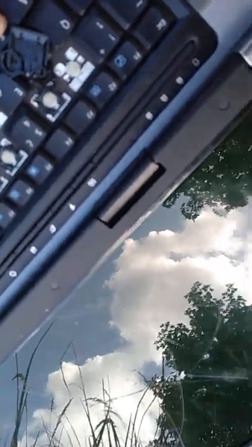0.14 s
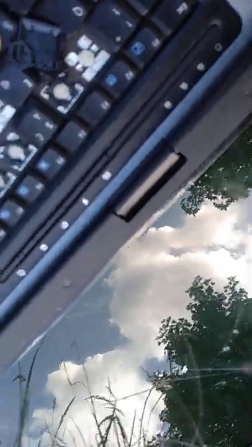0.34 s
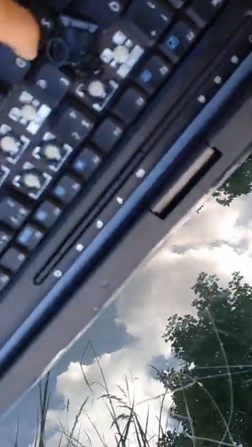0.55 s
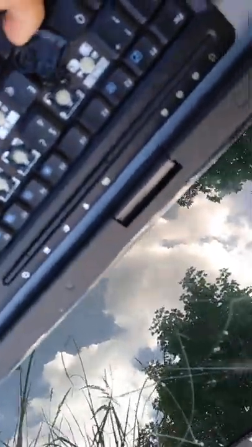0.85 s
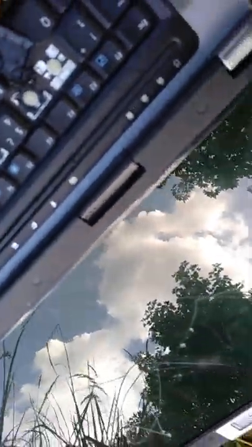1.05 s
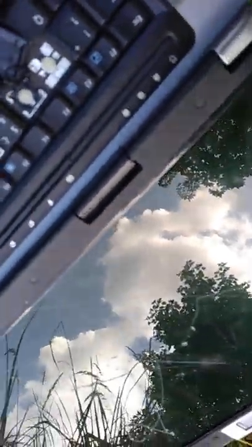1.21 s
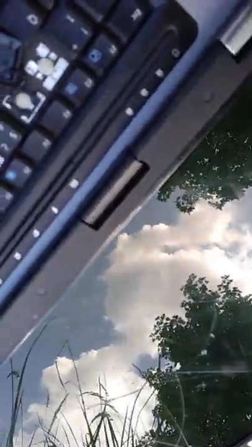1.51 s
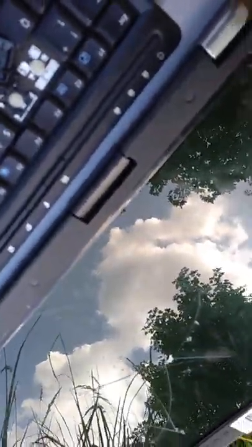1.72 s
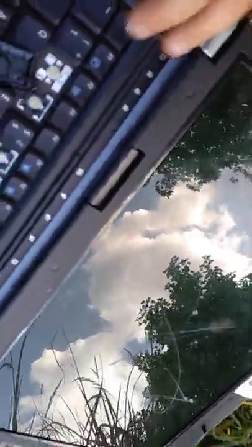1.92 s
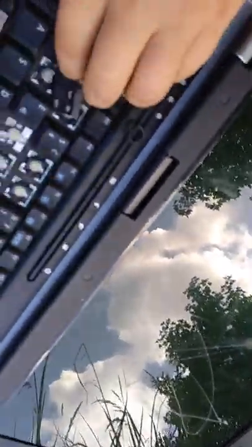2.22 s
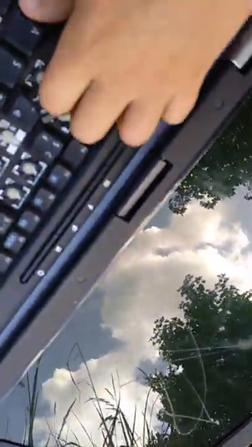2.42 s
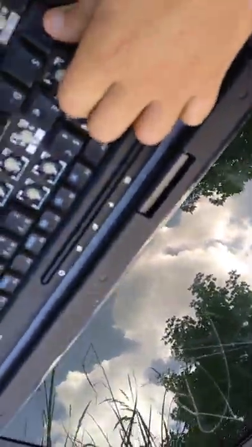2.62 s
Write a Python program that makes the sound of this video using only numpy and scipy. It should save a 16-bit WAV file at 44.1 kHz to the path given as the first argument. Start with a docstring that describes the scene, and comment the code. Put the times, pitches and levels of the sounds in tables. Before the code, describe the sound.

Plastic keycaps snap and click as they are pried off a laptop keyboard outdoors.

```python
"""Prying off laptop keycaps

Outdoors, close to the microphone, plastic keycaps are pried off a laptop keyboard.
Clips let go with hard snaps; loose caps tick and rattle, ring the thin metal retainers and knock
the hollow case. Fingers rub and scrabble over the keys, busiest at the end. Far off, a motor hums."""
import sys
import numpy as np
from scipy import signal
from scipy.fft import rfft, irfft, next_fast_len
from scipy.io import wavfile
from scipy.ndimage import map_coordinates

SR = 44100
rng = np.random.default_rng(int(sys.argv[2]) if len(sys.argv) > 2 else 0)


def unload_wav(signal):
    """Save mono or channel-first audio to the path in sys.argv[1] as 16-bit WAV at rate SR, clipped to [-1, 1]."""
    wavfile.write(
        sys.argv[1],
        SR,
        np.round(np.clip(np.atleast_2d(signal).T, -1, 1) * 32767).astype(np.int16),
    )


N = 121275
RING_SIZE = SR // 8
SCENE_T, RING_T = np.arange(N) / SR, np.arange(RING_SIZE) / SR  # seconds into the scene, into one ring
ATTACK = 1 - np.exp(-RING_T / 0.000043)  # the near-instant rise of a hard contact
CONTACT_GAIN_DB = -3.5  # on striking caps and touching edges
TICK_T60_S, CLACK_T60_S, CASE_T60_S = 0.014, 0.022, 0.073


def amp(db):
    """Decibels to gain."""
    return 10 ** (np.asarray(db) / 20)


def unit(x):
    """Scale to rms 1."""
    return x / np.sqrt(np.mean(x ** 2) + 1e-20)


def fade(t60):
    """An exponential decay, 60 dB down after t60 seconds."""
    return np.exp(-np.log(1000) * RING_T / t60)


def curves(rows):
    """One value per sample for each column after the time."""
    times, *columns = np.transpose(rows)
    return [np.interp(SCENE_T, times, column) for column in columns]


def colour(x, points):
    """Minimum-phase filter with the gain of (Hz, dB) points."""
    size = 4096
    hz, db = np.transpose(points)
    bin_hz = np.fft.rfftfreq(size, 1 / SR)
    gain = amp(np.interp(np.log(bin_hz + 1), np.log(hz), db))
    cepstrum = irfft(np.log(gain))
    cepstrum[1:size // 2] *= 2
    cepstrum[size // 2 + 1:] = 0
    impulse = irfft(np.exp(rfft(cepstrum)))
    return signal.fftconvolve(x, impulse)[:len(x)]


def add(track, start_s, sound):
    """Mix a sound into a track at a time."""
    part = track[round(start_s * SR):][:len(sound)]
    part += sound[:len(part)]


def burst(spectrum, t60):
    """Dense modes of a small part, struck once; rms 1 over the first milliseconds."""
    deck_shiver = amp(-20.5) * fade(0.05)
    envelope = ATTACK * (fade(t60) + deck_shiver)
    strike = colour(rng.standard_normal(RING_SIZE) * envelope, spectrum)
    return strike / np.sqrt(np.mean(strike[:200] ** 2))


def ringing(modes_hz, t60):
    """Equally strong modes of one part, struck together."""
    return sum(np.sin(2 * np.pi * hz * RING_T) for hz in modes_hz) * fade(t60) * ATTACK


def cap_shift():
    """Caps differ a little in size and so in pitch: random factors for a spectrum's (Hz, dB)."""
    return [np.exp(0.04 * rng.normal()), 1]


# Clips letting go: (time [s], level [dB], push level [dB], three resonances [Hz])
CLIP_SNAPS = [(0.1574, -12.5, -29.5, 5580, 9600, 14000), (0.2942, -9, -5, 5030, 9700, 13200),
              (1.7563, -16.5, -20.5, 7900, 10500, 13300), (1.8707, -10, -11, 7150, 9240, 11340)]
def clip_snaps(t60=0.0045):
    """A clip lets go: one push, three heavily damped resonances, a crack and a short shiver."""
    out = np.zeros(N)
    crack_spectrum = [(1400, -18.5), (5000, -5.5), (13000, -8.5), (16000, -5)]
    for start_s, db, push_db, *modes_hz in CLIP_SNAPS:
        modes = sum(gain * np.cos(2 * np.pi * hz * RING_T) for hz, gain in zip(modes_hz, amp([2, 7, 2])))
        ring = modes * ATTACK * fade(t60)
        hiss = unit(colour(rng.standard_normal(RING_SIZE), crack_spectrum))
        crack = amp(-8.5) * hiss * fade(t60)
        shiver = amp(-9) * hiss * fade(0.023)
        push = np.exp(-RING_T / 0.000061) + 1.3 * np.sin(2 * np.pi * 2700 * RING_T) * fade(0.0023)
        add(out, start_s, amp(db) * (ring + crack + shiver) + amp(push_db) * push)
    return out


# Spectra of a cap's clack and of the hollow case: (frequency [Hz], gain [dB])
CLACK_SPECTRUM = [(1500, -12.5), (3000, 1), (4000, -1), (5100, 4.5), (5800, -2.5), (6800, 7.5), (9000, -17)]
CASE_SPECTRUM = [(40, -13), (230, -12), (450, 2), (590, -5), (740, 5), (930, -0.5), (1900, 0), (2350, 2.5),
                 (2900, -2), (5500, -12.5)]
# Caps striking, levels relative: (time [s], tick [dB], clack [dB], knock [dB])
CAP_STRIKES = [(0.5643, -35, -34, -37), (0.678, -24.5, -33, -37.5), (1.026, -11.5, -21.5, -32.5),
               (1.0562, -12.5, -22.5, -35), (1.213, -18.5, -25, -36.5), (1.2488, -18.5, -26.5, -39),
               (1.2628, -23.5, -31, -41), (1.387, -26.5, -24, -31), (1.491, -22, -28, -40),
               (1.511, -16.5, -29.5, -44), (1.5757, -23.5, -36.5, -40), (1.6217, -24.5, -26.5, -49),
               (1.812, -32.5, -33, -49), (2.0103, -26, -30, -34.5), (2.035, -11.5, -21.5, -31),
               (2.0435, -10, -24, -35.5), (2.2267, -9, -18.5, -15), (2.2346, -11.5, -20.5, -18),
               (2.2424, -11.5, -26, -42), (2.3297, -17, -31.5, -43), (2.3466, -12, -27, -54),
               (2.386, -15.5, -31, -28), (2.4353, -23.5, -33, -34), (2.4977, -14.5, -16.5, -24),
               (2.5029, -13.5, -45, -29.5), (2.592, -15, -14, -21), (2.5973, -10, -18.5, -14.5),
               (2.6606, -14, -22.5, -37), (2.6894, -18, -30, -43), (2.719, -20, -26.5, -44)]
def cap_strikes():
    """Close to the microphone, a cap grazes its seat, then ticks, clacks and knocks the case."""
    out = np.zeros(N)
    for start_s, tick_db, clack_db, knock_db in CAP_STRIKES:
        shift = cap_shift()
        lead_s = 0.0023 * rng.uniform(0.32, 2.2)
        graze = amp(tick_db - 16) * burst(TICK_SPECTRUM, TICK_T60_S)
        tick = amp(tick_db) * plastic_tick()
        clack = amp(clack_db) * burst(np.multiply(CLACK_SPECTRUM, shift), CLACK_T60_S)
        knock = amp(knock_db) * burst(np.multiply(CASE_SPECTRUM, shift), CASE_T60_S)
        add(out, start_s - lead_s, graze)
        add(out, start_s, tick + clack + knock)
    return amp(CONTACT_GAIN_DB) * out


# Spectrum of a hard plastic contact: (frequency [Hz], gain [dB])
TICK_SPECTRUM = [(3000, -25.5), (7000, -11.5), (8500, -0.5), (10200, 1), (11600, -1.5), (12700, -4.5),
                 (13700, 0), (15500, -8.5)]
def plastic_tick():
    """A bright contact of hard plastic that shakes the retainer beneath."""
    return burst(np.multiply(TICK_SPECTRUM, cap_shift()), TICK_T60_S) + amp(-6.5) * retainer_ring()


# Modes of the metal retainers under the caps: (frequency [Hz], relative level [dB])
RETAINER_MODES = [(6750, -4), (8300, -10), (13900, -6)]
def retainer_ring(detune=0.016):
    """One thin retainer rings briefly in all its modes, a little off the others' pitch."""
    return sum(amp(db) * ringing([hz * (1 + detune * rng.normal())], t60=0.019)
               for hz, db in RETAINER_MODES)


# Cap edges touching: (time [s], relative level [dB])
EDGE_TICKS = [(0.5, -34), (0.518, -36), (0.737, -41.5), (0.7889, -29.5), (0.812, -36), (1.0503, -19),
              (1.331, -28.5), (1.411, -20.5), (1.43, -23.5), (1.857, -30.5), (2.0528, -15), (2.287, -19),
              (2.295, -18.5), (2.316, -22.5), (2.3362, -16), (2.3524, -15.5), (2.365, -26), (2.406, -22),
              (2.4902, -11)]
def edge_ticks():
    """Cap edges touch: a bright tick with little clack and no knock."""
    out = np.zeros(N)
    for start_s, db in EDGE_TICKS:
        touch = plastic_tick() + amp(-12.5) * burst(CLACK_SPECTRUM, CLACK_T60_S)
        add(out, start_s, amp(db + CONTACT_GAIN_DB) * touch)
    return out


# Caps flicked free: (time [s], level [dB], three modes [Hz])
CAP_FLICKS = [(0.9105, -36.5, 2256, 5150, 5300), (1.1618, -19.5, 6750, 9650, 11200),
              (1.1835, -21, 5300, 10540, 10200), (1.2319, -21, 7440, 8400, 11100),
              (1.838, -29, 7100, 8200, 10000), (1.969, -23, 3490, 9000, 9900),
              (1.9773, -24, 1940, 3520, 9650), (2.0054, -19, 9160, 10400, 11200)]
def cap_flicks():
    """A cap flicked free rings with three modes of its own over a brief clack."""
    out = np.zeros(N)
    for start_s, db, *modes_hz in CAP_FLICKS:
        contact = burst(TICK_SPECTRUM, t60=0.0045) + burst(CLACK_SPECTRUM, CLACK_T60_S)
        add(out, start_s, amp(db) * (ringing(modes_hz, t60=0.018) + amp(-8.5) * contact))
    return out


# Retainers plucked free: (time [s], level [dB], pitch [Hz])
RETAINER_PINGS = [(1.027, -21.5, 6220), (1.163, -19, 6760), (1.198, -30, 6760), (1.449, -29, 6750),
                  (2.5586, -14.5, 8320), (2.587, -12, 6940)]
def retainer_pings(t60=0.033, overtone_ratio=2.06):
    """A retainer slips off a nail with a tick and rings at one pitch with a glinting overtone."""
    out = np.zeros(N)
    for start_s, db, hz in RETAINER_PINGS:
        tone = ringing([hz], t60) + amp(-11) * ringing([hz * overtone_ratio], t60)
        slip = amp(-8) * burst(TICK_SPECTRUM, TICK_T60_S)
        add(out, start_s, amp(db) * (tone + slip))
    return out


# Fingertips bumping the case: (time [s], level [dB], pitch [Hz])
CASE_BUMPS = [(1.655, -30, 951), (2.147, -32, 1000), (2.378, -29, 1610), (2.601, -26, 750),
              (2.72, -22.5, 735)]
def case_bumps(t60=0.019):
    """A soft fingertip wakes one low mode of the case and a little of the others."""
    out = np.zeros(N)
    for start_s, db, hz in CASE_BUMPS:
        low_mode = np.sin(2 * np.pi * hz * RING_T) * fade(t60)
        add(out, start_s, amp(db) * (low_mode + amp(-12.5) * burst(CASE_SPECTRUM, t60)))
    return out


# Spectrum of fingers scratching the keys: (frequency [Hz], gain [dB])
SCRATCH_SPECTRUM = [(1500, -27.5), (3500, -5.5), (10200, 5), (12500, 2.5), (13800, -4.5), (16000, -5.5)]
# Fingers on the keys, levels relative: (time [s], scratch [dB], case beneath [dB])
RUB_LEVELS = [(0, -47, -51), (.2, -57, -63.5), (.33, -52.5, -58), (.37, -44.5, -51.5), (.53, -50.5, -52.5),
              (.625, -29.5, -34), (.73, -55.5, -56.5), (1.1, -42.5, -55), (1.3, -39, -44),
              (1.355, -51, -52), (1.41, -31.5, -44.5), (1.54, -52.5, -54), (1.63, -32.5, -43.5),
              (1.89, -52, -62), (1.97, -41, -40), (2.08, -40.5, -49), (2.14, -31.5, -41.5),
              (2.2, -39.5, -49), (2.35, -28, -40), (2.42, -36.5, -41.5), (2.49, -25.5, -32),
              (2.565, -32, -44.5), (2.598, -13, -26.5), (2.63, -36.5, -40.5), (2.75, -26, -37.5)]
def finger_rubbing(catches_per_s=200, scrabble_start_s=1.08, bare_end_s=1.73):
    """Fingers first slide smoothly, then scrabble in tiny catches; retainers and case sound along."""
    caught = rng.random(N) < catches_per_s / SR
    catches = caught * amp(10 * np.clip(rng.standard_normal(N), -2, 2))
    catch_power = np.abs(signal.fftconvolve(catches ** 2, fade(0.022) ** 2)[:N])
    rough_share = np.where(SCENE_T < scrabble_start_s, 0.3, 0.7)
    grip = np.sqrt(1 - rough_share + rough_share * catch_power / catch_power.mean())
    scratch = unit(colour(grip * rng.standard_normal(N), SCRATCH_SPECTRUM))
    case = unit(colour(grip * rng.standard_normal(N), CASE_SPECTRUM))
    bare = (SCENE_T > scrabble_start_s) & (SCENE_T < bare_end_s)  # nails on bare metal ring it most
    jingle = rough_share * np.where(bare, 1, amp(-9)) * retainer_jingle()
    scratch_db, case_db = curves(RUB_LEVELS)
    return amp(-3) * (amp(scratch_db) * (scratch + jingle) + amp(case_db) * case)


def retainer_jingle(rings_per_s=110):
    """Brushed retainers ring at random moments; rms 1."""
    out = np.zeros(N)
    for position, strength in rng.random((round(rings_per_s * N / SR), 2)):
        add(out, position * N / SR, strength ** 2 * retainer_ring())
    return unit(out)


# Skin gliding over a cap: (peak time [s], half length [s], level [dB])
SKIN_GLIDES = [(0.259, 0.029, -43), (0.984, 0.056, -53)]
def skin_glides(band_hz=(7000, 8800)):
    """Skin whispers over smooth plastic in a soft swell."""
    swell = sum(amp(db) * np.exp(-((SCENE_T - peak_s) / half_s) ** 2 / 2)
                for peak_s, half_s, db in SKIN_GLIDES)
    band = signal.butter(1, band_hz, "band", fs=SR)
    return swell * unit(signal.lfilter(*band, rng.standard_normal(N)))


# The far motor's speed: (time [s], firing rate [Hz])
MOTOR_SPEED = [(0, 107.3), (.45, 96.5), (1.15, 98.9), (1.7, 111.9), (2.75, 114.5)]
def distant_motor(waver_db=3.5, wavers_per_s=11):
    """Far from the microphone a motor hums in two harmonics; its speed drifts and its level wavers."""
    phase = 2 * np.pi * np.cumsum(curves(MOTOR_SPEED)[0]) / SR
    hum = amp(-69.5) * np.sin(phase) + amp(-64) * np.sin(2 * phase)
    knots = rng.standard_normal(int(N * wavers_per_s / SR) + 2)
    waver = map_coordinates(knots, [SCENE_T * wavers_per_s])
    return amp(waver_db * waver) * hum


# Spectrum of the outdoor air: (frequency [Hz], gain [dB])
AIR_SPECTRUM = [(25, -2), (150, -3), (3000, -16.5), (10000, -30.5), (16000, -13)]
def open_air():
    """Quiet open air all around the microphone: a steady low rush with a faint hiss."""
    return amp(-60.5) * unit(colour(rng.standard_normal(N), AIR_SPECTRUM))


def scene():
    """One microphone outdoors: the keyboard dry and close, the motor far behind."""
    keys = clip_snaps() + cap_strikes() + cap_flicks() + edge_ticks() + retainer_pings()
    hands = case_bumps() + skin_glides() + finger_rubbing()
    return (keys + hands + distant_motor() + open_air())[None]


def record(dry):
    """The loudest snap peaks are limited just under full scale; nothing sounds above 15.9 kHz."""
    ceiling, top_hz = 0.9, 15900
    size = next_fast_len(N + RING_SIZE)
    spectrum = rfft(np.clip(dry, -ceiling, ceiling), size)
    passband = np.fft.rfftfreq(size, 1 / SR) < top_hz
    return irfft(spectrum * passband, size)[:, :N]


dry = scene()
out = record(dry)
unload_wav(out)
```